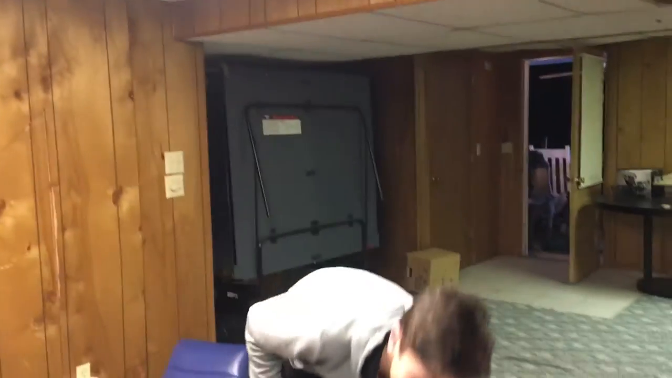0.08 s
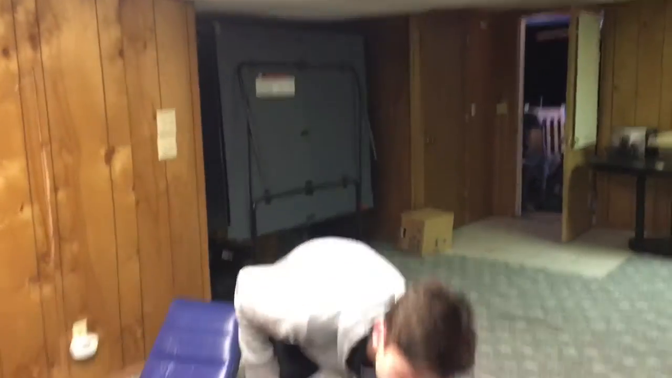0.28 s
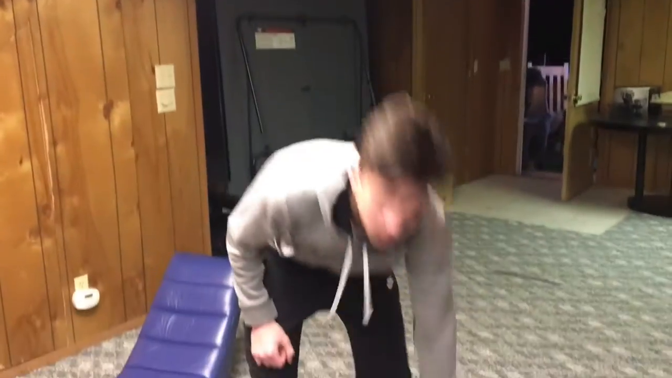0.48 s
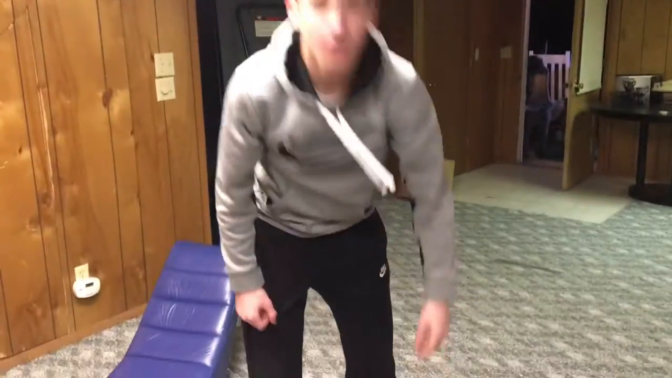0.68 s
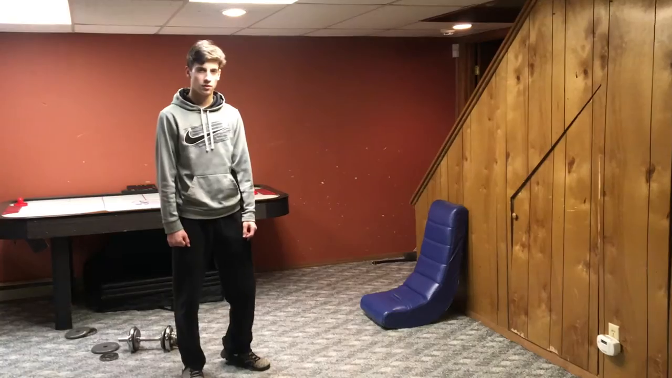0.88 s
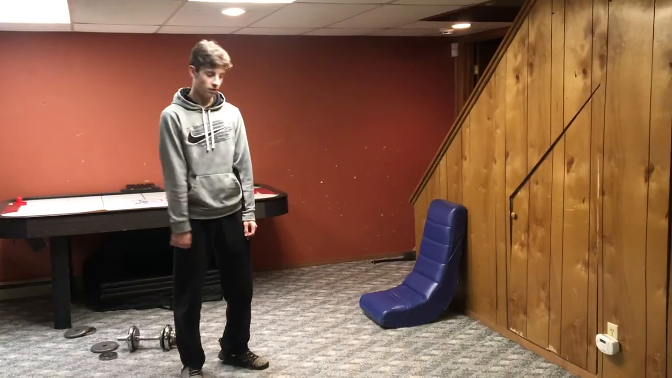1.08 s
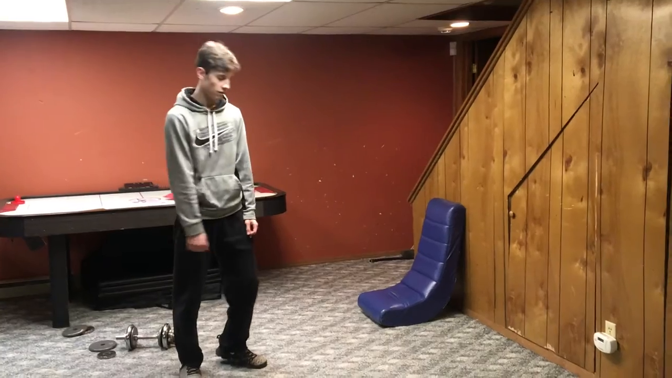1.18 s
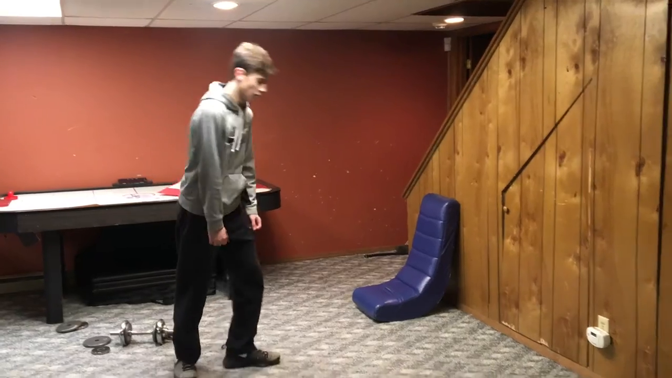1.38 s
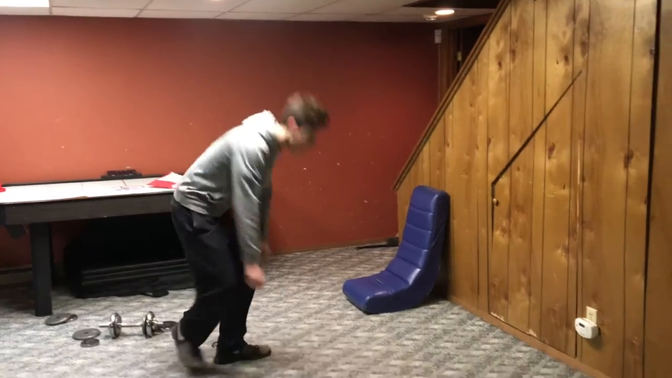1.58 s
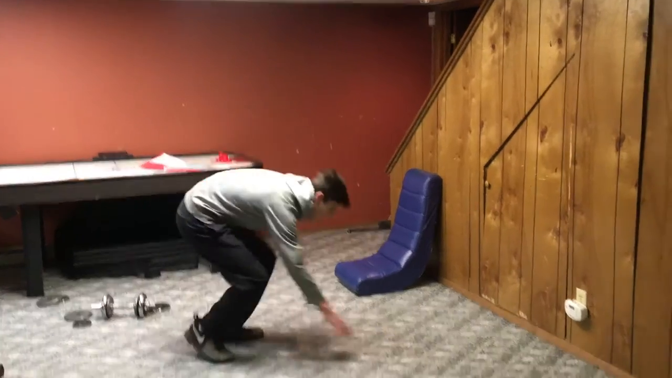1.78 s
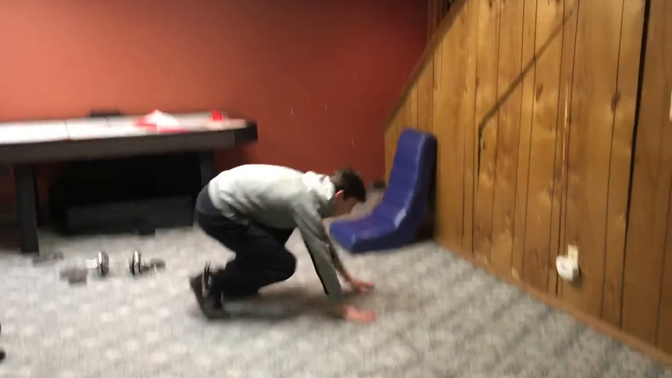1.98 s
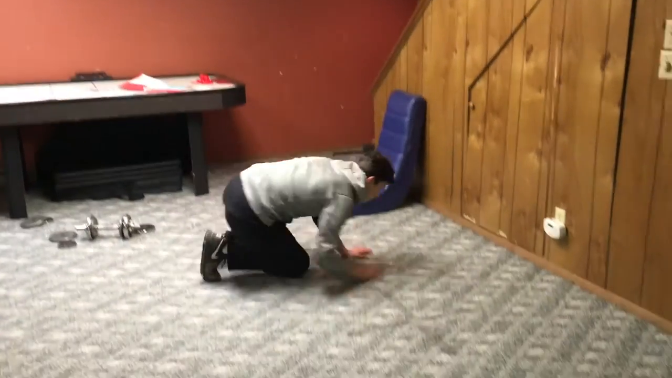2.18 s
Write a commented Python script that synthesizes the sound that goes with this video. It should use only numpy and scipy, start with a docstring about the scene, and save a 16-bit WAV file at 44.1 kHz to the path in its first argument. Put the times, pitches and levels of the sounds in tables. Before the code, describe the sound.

A small iron dumbbell is put down on carpet, plates and bar clinking in a quick choked cluster, then soft steps, padded hand and knee thuds and cloth rustle in a small low-humming basement, picked up at moderate distance.

```python
"""A low basement room with carpet: rumble, hiss and a steady hum reach the microphone throughout.
First comes a soft knock on the floor, then a small dumbbell is put down: its weight thuds and its iron
plates and bar clink, each contact a noise crack and a set of modes, choked quickly to a faint ring.
Then soft steps, hands and knees land as padded noise bursts over low booms, and clothes rustle.
Most of it is heard direct and then through a short dense room tail."""
import sys
import numpy as np
from scipy import signal
from scipy.fft import irfft
from scipy.io import wavfile
from scipy.ndimage import uniform_filter1d

SR = 44100
rng = np.random.default_rng(int(sys.argv[2]) if len(sys.argv) > 2 else 0)


def inscribe(sig):
    """Save sig as 16-bit PCM at rate SR to the path in sys.argv[1].

    A 1-D sig is mono; a 2-D sig holds one channel per row.
    Samples are clipped to [-1, 1] before scaling.
    """
    pcm = np.round(np.clip(np.atleast_2d(sig).T, -1, 1) * 32767)
    wavfile.write(sys.argv[1], SR, pcm.astype(np.int16))


N = 99225

SKIRT_TOP_HZ = 12000


def undb(db):
    """Decibels to gain."""
    return 10 ** (np.asarray(db) / 20)


def since(start):
    """Seconds gone by since start, zero before it."""
    return np.maximum(np.arange(N) / SR - start, 0)


def fade(t, attack, t60):
    """A quick rise and an exponential decay by 60 dB in t60 seconds."""
    return (1 - np.exp(-t / attack)) * np.exp(-np.log(1000) * t / t60)


def noise(gain):
    """Noise of rms 1 whose spectrum is gain(Hz)."""
    hz = np.maximum(np.fft.rfftfreq(N, 1 / SR), 1)
    random_phase = np.exp(2j * np.pi * rng.random(len(hz)))
    x = irfft(gain(hz) * random_phase, N)
    return x / x.std()


def band(hz, octaves, skirt_db):
    """A hump of noise around hz, with a weak skirt that falls off in the treble; rms 1 in all."""
    def spectrum(f):
        hump = np.exp(-.5 * (np.log2(f / hz) / octaves) ** 2)
        low_side = f / (f + hz / 10)
        high_side = 1 / np.hypot(1, f / hz / 2) / np.hypot(1, (f / SKIRT_TOP_HZ) ** 2)
        return hump + undb(skirt_db) * low_side * high_side
    return noise(spectrum)


# Spectrum shape of the empty room's air: f/Hz, relative level/dB
AIR_SPECTRUM = [(20, -34), (40, -13.5), (65, -0.5), (90, -4), (125, -9), (180, -19.5), (300, -26),
                (500, -37), (1000, -38), (3000, -43), (6000, -46), (15000, -50.5)]
AIR_DB, HUM_HZ, HUM_DB = -60, 58.3, -64.5  # rms levels


def background():
    """The empty room at the microphone: shaped noise for rumble and faint hiss, one sine for the hum."""
    hz, db = np.array(AIR_SPECTRUM).T
    air = noise(lambda f: undb(np.interp(np.log(f), np.log(hz), db)))
    hum = np.sqrt(2) * np.sin(2 * np.pi * HUM_HZ * since(0))
    return undb(AIR_DB) * air + undb(HUM_DB) * hum


ROOM_T60_S, ROOM_DB, ROOM_DELAY_S, ROOM_TOP_HZ = 0.2, -13, 0.0051, 6750
LOW_ROOM_HZ, LOW_ROOM_DB, LOW_ROOM_T60_S = 350, -26.5, 0.16


def room(x):
    """Panelled walls and a low ceiling add a short dense tail; its low part swells in more slowly."""
    t = since(ROOM_DELAY_S)
    bright = noise(lambda f: 1 / np.hypot(1, f / ROOM_TOP_HZ)) * fade(t, 0.0028, ROOM_T60_S)
    low = band(LOW_ROOM_HZ, octaves=0.63, skirt_db=-53) * fade(t, .01, LOW_ROOM_T60_S)
    tail = undb(ROOM_DB) * bright / np.linalg.norm(bright)
    tail = tail + undb(LOW_ROOM_DB) * low / np.linalg.norm(low)
    return x + signal.fftconvolve(x, tail)[:N]


# Booms of the floor under shifting weight: t/s, level/dB, f/Hz
FLOOR_BOOMS = [(0.029, -51, 135), (0.235, -48, 125.9), (0.875, -52, 69.9), (1.202, -48.5, 160),
               (1.437, -44.5, 79.3), (1.895, -51, 79), (1.979, -52.5, 109.4), (2.091, -50, 96)]
BOOM_T60_S, BOOM_ATTACK_S = 0.13, 0.0047


def booms():
    """Footfalls wake a low resonance of the floor and room: decaying sines."""
    out = np.zeros(N)
    for start, db, hz in FLOOR_BOOMS:
        t = since(start)
        out += undb(db) * fade(t, BOOM_ATTACK_S, BOOM_T60_S) * 2 * np.sin(2 * np.pi * hz * t)
    return out


# Swishes of clothes and soles: middle t/s, half length/s, level/dB, centre f/Hz, width/octaves
CLOTH_SWISHES = [(0.118, 0.02, -72.5, 3020, 1), (1.337, 0.016, -68, 1830, 0.47),
                 (1.642, 0.012, -73, 3540, .8), (1.708, 0.12, -75, 2360, 0.35),
                 (1.815, 0.0073, -66, 3400, 0.91), (2.084, 0.052, -72.5, 2196, 1),
                 (2.221, 0.029, -63.5, 2650, 0.92)]
# Faint rustle of movement: t/s, level/dB
RUSTLE_LEVEL = [(0, -80.5), (.3, -84), (.6, -86), (1.05, -82.5), (1.25, -75), (1.5, -74.5), (1.8, -75.5),
                (2.25, -70)]
RUSTLE_HZ = 500
SHUFFLE_HZ, SHUFFLE_DB = 180, 4.5  # low shuffling on the floor, re the rustle
SWISH_SKIRT_DB, SWISH_GRAIN_DB = -9, 1.5


def clothes():
    """Cloth rubs in grains: swells of noise over a faint running rustle, flickering in level."""
    t = since(0)
    grain = undb(SWISH_GRAIN_DB * noise(lambda f: 1 / (1 + (f / 150) ** 2)))
    swish = np.zeros(N)
    for middle, half, db, hz, octaves in CLOTH_SWISHES:
        swell = np.exp(-.5 * ((t - middle) / half) ** 2)
        swish += undb(db) * swell * band(hz, octaves, SWISH_SKIRT_DB)
    rustle = band(RUSTLE_HZ, octaves=1.47, skirt_db=-30.5)
    shuffle = undb(SHUFFLE_DB) * band(SHUFFLE_HZ, octaves=0.47, skirt_db=-51.5)
    level = undb(np.interp(t, *np.array(RUSTLE_LEVEL).T))
    return grain * (swish + level * (rustle + shuffle))


# Feet, hands and knees on the carpet: t/s, level/dB, centre f/Hz, t60/s, scuff level/dB
FLOOR_KNOCKS = [(0.02, -49, 255, 0.056, -65), (0.791, -66, 283, 0.28, -81), (0.864, -59.5, 500, 0.18, -70),
                (1.179, -54.5, 170, 0.093, -82), (1.279, -50.5, 290, 0.087, -69.5),
                (1.798, -48.5, 265, 0.076, -66), (1.87, -54, 350, 0.16, -69.5),
                (1.998, -51.5, 217.4, 0.18, -62.5), (2.013, -50.5, 650, 0.064, -63),
                (2.088, -52.5, 211, 0.066, -62.5)]
KNOCK_OCTAVES, KNOCK_SKIRT_DB, SCUFF_HZ, SCUFF_T60_S = 0.61, -11.5, 1510, 0.17


def knocks():
    """Padded blows on the floor: soft-edged noise bursts, each with a scuff of the pile."""
    out = np.zeros(N)
    for start, db, hz, t60, scuff_db in FLOOR_KNOCKS:
        t = since(start)
        out += undb(db) * fade(t, 0.0027, t60) * band(hz, KNOCK_OCTAVES, KNOCK_SKIRT_DB)
        scuff = band(SCUFF_HZ, octaves=0.39, skirt_db=-5.5)
        out += undb(scuff_db) * fade(t, 0.0011, SCUFF_T60_S) * scuff
    return out


# Dry ticks and clacks, rebounds of the plates, taps of shoes and hands: t/s, level/dB, centre f/Hz
DRY_TICKS = [(0.023, -66, 2550), (0.051, -56, 3280), (0.3368, -34, 3370), (0.369, -30, 5370),
             (0.3705, -36.5, 1660), (0.3722, -41, 5470), (0.3757, -37.5, 1296), (0.3801, -38.5, 1270),
             (0.405, -38.5, 4840), (0.4117, -41.5, 3000), (0.5236, -51, 3700), (1.277, -68, 6510),
             (1.2786, -59.5, 1500), (1.813, -58.5, 4000), (1.8723, -64, 3495), (1.873, -56, 1253),
             (2.002, -62.5, 4010)]
TICK_T60_S = .014
TICK_OCTAVES, TICK_SKIRT_DB, CLICK_DB = .45, -24, 3  # click re the spray


def ticks():
    """Dry contacts too brief to ring: a click of a few cycles and a short spray of noise."""
    out = np.zeros(N)
    for start, db, hz in DRY_TICKS:
        t = since(start)
        click_envelope = 2 * (1 - np.exp(-2 * hz * t)) * np.exp(-hz * t)
        click = click_envelope * np.sin(2 * np.pi * hz * t)
        spray = fade(t, .0002, TICK_T60_S) * band(hz, TICK_OCTAVES, TICK_SKIRT_DB)
        out += undb(db) * (undb(CLICK_DB) * click + spray)
    return out


# Dull knocks of the dumbbell settling: t/s, level/dB, centre f/Hz, t60/s
SETTLING_BUMPS = [(0.2241, -48, 300, 0.25), (0.2232, -53, 1720, 0.16), (0.2374, -44, 326, 0.098),
                  (0.2357, -40.5, 1110, 0.12), (.327, -46, 143, 0.046), (0.355, -45, 1590, 0.13),
                  (0.354, -58, 347, 0.38), (0.369, -44, 1130, 0.11), (0.409, -52.5, 629, 0.037),
                  (0.409, -51.5, 1866, 0.1), (0.497, -61.5, 1300, 0.12)]
BUMP_OCTAVES, BUMP_SKIRT_DB = 0.56, -37


def bumps():
    """The weight settles on the carpet and loose plates knock on the bar: decaying noise bursts."""
    out = np.zeros(N)
    for start, db, hz, t60 in SETTLING_BUMPS:
        out += undb(db) * fade(since(start), 0.0007, t60) * band(hz, BUMP_OCTAVES, BUMP_SKIRT_DB)
    return out


RING_ATTACK_S = 0.0003
# the many weak overtones of the iron: level re the ring, tilt (dB per octave), decay
SHIMMER_DB, SHIMMER_TILT_DB, SHIMMER_T60_S = -21, -6, .2


def shimmer(t):
    """A crowd of weak inharmonic overtones that fills the gaps between the main modes."""
    hz = rng.uniform(1500, 15500, size=160)
    gain = undb(SHIMMER_TILT_DB * np.log2(hz / hz.min()))
    partials = np.sin(2 * np.pi * (hz[:, None] * t + rng.random((len(hz), 1))))
    return gain @ partials / np.linalg.norm(gain) * fade(t, RING_ATTACK_S, SHIMMER_T60_S)


# random values per s, and how many more for each Hz of the mode
WAVERS_PER_S, WAVERS_PER_HZ = 55, 0.007


def wavering(t, hz, steady):
    """A steady tone plus a random wavering that blurs the ring, as a diffuse room does, faster for high modes."""
    steps = np.arange(400)
    rate = WAVERS_PER_S + WAVERS_PER_HZ * hz
    random_values = rng.standard_normal(len(steps)) + 1j * rng.standard_normal(len(steps))
    waver = np.interp(t * rate, steps, random_values)
    return np.sqrt(steady) + np.sqrt(1 - steady) * waver


# Clinks of the iron: t/s, part struck, ring level/dB, choke time/s, free ring level/dB re the ring,
# crack level/dB, crack centre f/Hz, crack width/octaves, crack t60/s
IRON_CLINKS = [(0.236, "outer plate", -27.5, .012, -27.5, -29.5, 2900, .7, 0.072),
               (0.352, "bar", -38, 0.007, -7, -35.5, 7300, 0.2, 0.0083),
               (.3692, "bar", -31, 0.011, -10, -33, 6000, 0.24, 0.022),
               (0.4054, "inner plate", -35, 0.007, -32, -36.5, 4700, 0.4, 0.04),
               (.4083, "inner plate", -29, .0048, -19.5, -41, 2000, 0.37, 0.045)]
# Modes of each part of the dumbbell: f/Hz
PART_MODE_HZ = { "outer plate": [1640, 1785, 2085, 2917, 3150, 3500, 3698, 3745, 4626, 4935, 5098, 5972,
                8300, 8460, 9545, 10700, 11220, 11500, 11750], "inner plate": [1620, 1786, 2309, 3040, 3140,
                3214, 3395, 3620, 3690, 3760, 4786, 4861, 5290, 5950, 8470, 9534, 11300, 11560, 12350,
                14680], "bar": [1680, 3125, 3178, 4735, 4790, 5973, 12350, 14650]}
# Levels of those modes in the same order: level/dB re the ring
PART_MODE_DB = { "outer plate": [-20, -12, -16, -14, -6, -7, 1, -5, -7, -4, -9, -2.5, -12, -18, -32, -25,
                -22, -26, -28], "inner plate": [-13, -10, -14, -13, 0, -6, -9, -1, -3, -10, -12, -17, -14,
                -11, -17, -23, -23, -22, -30, -27], "bar": [-17, 0, -8, -19, -21, -21, -37, -34]}
# Decay of each part's free ring: t60/s
FREE_RING_T60_S = {"outer plate": .26, "inner plate": .19, "bar": .22}
# How much of each part's free ring is one steady tone, the rest wavering at random: share (0-1)
STEADY_RING_SHARE = {"outer plate": .25, "inner plate": .55, "bar": .9}
CRACK_ATTACK_S, CRACK_SKIRT_DB = 0.00018, -26.5
CHOKE_CURVE = 2.8  # above 1: the grip tightens as the plates close
BAR_PINCH_S, BAR_PINCH_DECAY_S = 0.365, 0.033  # from then on the bar's ring is damped further
PHASE_SCATTER = .4  # how far out of step the modes start (cycles)
CHATTER_DB, CHATTER_HZ = 1.5, 300  # level flicker while the plates touch


def clinks():
    """Metal meets metal: a crack, then modes that chatter while choked and ring on faintly, wavering."""
    out = np.zeros(N)
    t = np.arange(SR // 2) / SR
    for (start, part, ring_db, choke, free_db,
         crack_db, crack_hz, crack_octaves, crack_t60) in IRON_CLINKS:
        ring = undb(SHIMMER_DB) * shimmer(t)
        choked = (1 - np.exp(-t / RING_ATTACK_S)) * np.exp(-(t / choke) ** CHOKE_CURVE)
        for hz, db in zip(PART_MODE_HZ[part], PART_MODE_DB[part]):
            # the free ring rises as the choked one dies
            free = fade(t, choke, FREE_RING_T60_S[part]) * wavering(t, hz, STEADY_RING_SHARE[part])
            envelope = choked + undb(free_db) * free
            tone = np.exp(2j * np.pi * (hz * t + PHASE_SCATTER * rng.random()))
            ring = ring + undb(db) * np.imag(envelope * tone)
        if part == "bar":
            ring = ring * np.exp(-np.maximum(start + t - BAR_PINCH_S, 0) / BAR_PINCH_DECAY_S)
        flicker = noise(lambda f: f / (f + CHATTER_HZ) / (1 + (f / CHATTER_HZ) ** 2))[:len(t)]
        chatter = undb(CHATTER_DB * choked * flicker)
        first = int(start * SR)
        out[first:first + len(t)] += undb(ring_db) * ring * chatter
        crack = band(crack_hz, crack_octaves, CRACK_SKIRT_DB)
        out += undb(crack_db) * fade(since(start), CRACK_ATTACK_S, crack_t60) * crack
    return out


def scene():
    """Dumbbell and movement through the room; booms and background reach the microphone without its tail."""
    in_room = clothes() + knocks() + ticks() + bumps() + clinks()
    return (background() + booms() + room(in_room))[None]


DIP_S, DIP_LENGTH_S = .7755, .009
TOP_HZ = 15600


def record(dry):
    """The sound drops out briefly once, with softened edges, and a steep low-pass cuts the top."""
    outside_dip = abs(since(0) - DIP_S) > DIP_LENGTH_S / 2
    dip = uniform_filter1d(1. * outside_dip, size=90)
    top_cut = signal.ellip(8, .2, 70, TOP_HZ, fs=SR, output="sos")
    return signal.sosfilt(top_cut, dry * dip)


dry = scene()
out = record(dry)
inscribe(out)
```